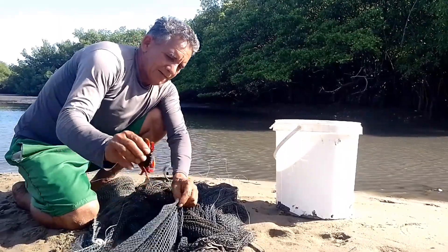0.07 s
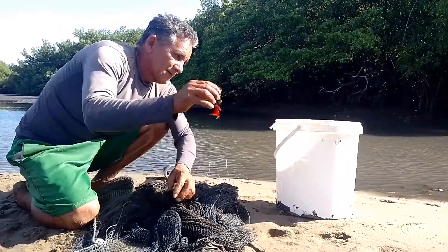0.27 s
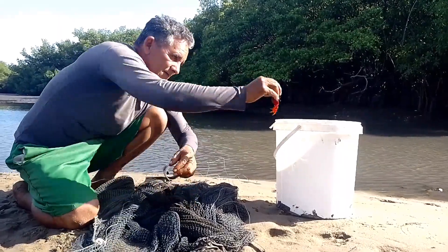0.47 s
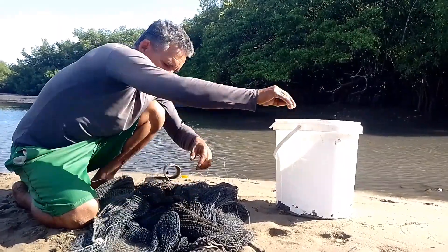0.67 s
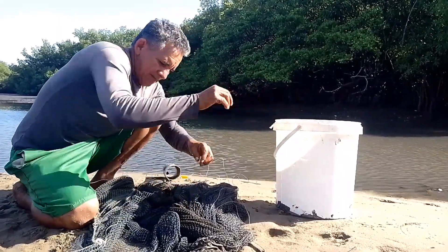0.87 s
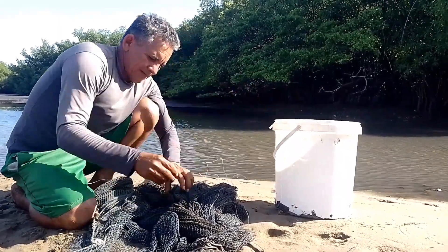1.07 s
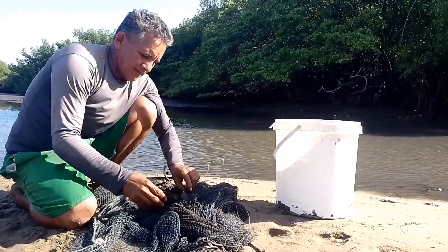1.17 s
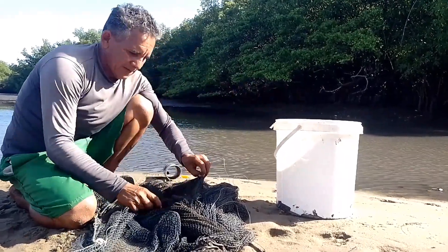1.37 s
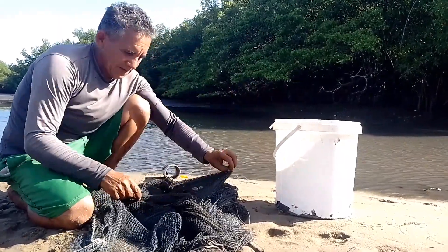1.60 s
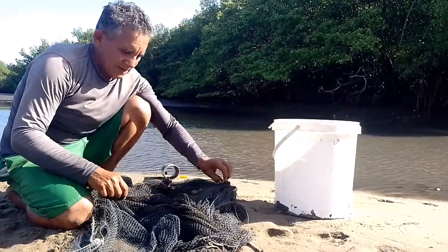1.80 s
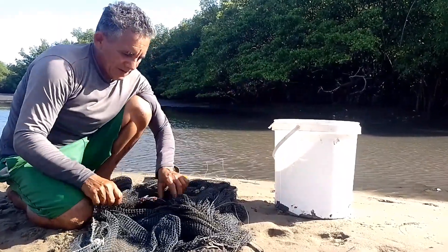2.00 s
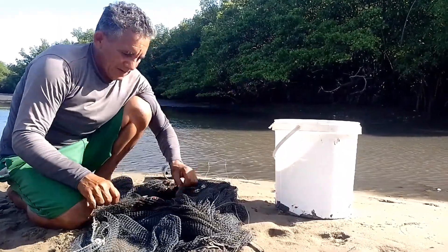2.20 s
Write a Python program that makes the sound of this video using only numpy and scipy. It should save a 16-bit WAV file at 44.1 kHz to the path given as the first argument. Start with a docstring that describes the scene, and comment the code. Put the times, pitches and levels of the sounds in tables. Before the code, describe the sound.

A crab thuds into a plastic bucket and scrabbles inside, with light wind.

```python
"""A crab drops into a plastic bucket on a riverbank. Its shell knocks on the wall and makes it ring,
its wet body thuds and slaps on the base, and its legs scrabble over the plastic in tiny jerks.
A fishing net rustles and ticks as it is handled, and its weights chink together.
Light wind buffets the microphone, most just before the drop, over the quiet hiss of open air."""
import sys
import numpy as np
from scipy import signal
from scipy.io import wavfile
from scipy.ndimage import uniform_filter1d

SR = 44100
rng = np.random.default_rng(int(sys.argv[2]) if len(sys.argv) > 2 else 0)


def int16_out(signal):
    """Quantize to a 16-bit WAV file."""
    q = np.round(np.clip(np.atleast_2d(signal).T, -1, 1) * 32767)
    wavfile.write(sys.argv[1], SR, q.astype(np.int16))


N = 99225

# Levels are relative. A "colour" says how strong a sound is at each frequency.
# colour of the open air: f/Hz, level/dB
AIR_COLOUR = [(290, -35), (500, 2.5), (830, -7), (1260, -14), (2720, -24.5), (9440, -18), (14800, -23.5),
              (15900, -34)]
# wind on the microphone: t/s, flutter level/dB, rumble level/dB
WIND_LEVELS = [(0, -66.5, -66), (.06, -55, -57), (.14, -58, -62), (.23, -46.5, -52), (.3, -56, -54),
               (.34, -42, -53), (.41, -38.5, -50), (.455, -52, -57), (.52, -31, -46), (.56, -44, -54),
               (.64, -49.5, -52), (.7, -52.5, -59), (.8, -60.5, -69.5), (1.14, -65.5, -69.5),
               (1.27, -53, -56.5), (1.35, -57.5, -58), (1.44, -66, -69.5), (1.52, -60, -61),
               (1.72, -64, -60), (1.8, -58.5, -56.5), (1.89, -66.5, -67.5), (2.1, -68.5, -69.5),
               (2.25, -78.5, -71.5)]
# colour of the wind's flutter: f/Hz, level/dB
FLUTTER_COLOUR = [(130, -57), (170, -7.5), (215, 3), (260, 3), (340, 0.5), (420, -17.5), (570, -25.5),
                  (810, -42.5), (1300, -68), (2500, -81)]
# colour of the wind's rumble: f/Hz, level/dB
RUMBLE_COLOUR = [(20, -17.5), (35, -13.5), (56, -1.5), (85, 9), (135, 6), (165, -10.5), (230, -52)]
# the brighter top of the gust: t/s, level/dB
GUST_LEVELS = [(.3, -100), (.36, -66), (.41, -50.5), (.46, -59), (.525, -51), (.57, -58), (.66, -57),
               (.72, -65), (.8, -77)]
# its colour: f/Hz, level/dB
GUST_COLOUR = [(250, -22.5), (430, 4.5), (560, -8), (730, -12.5), (900, -28), (1300, -47.5), (2500, -94)]
# single swirls of air hit the microphone: t/s, level/dB, f/Hz
BUFFETS = [(0.4186, -28.5, 265), (0.487, -29, 320), (0.5139, -28, 267), (0.5258, -25, 380),
           (0.5972, -25, 345), (.632, -38, 380), (1.789, -44.5, 232)]

# the net slides through the hands: t/s, level/dB
NET_LEVELS = [(0, -88.5), (.5, -86), (.7, -82.5), (1.15, -82.5), (1.26, -77.5), (1.43, -85), (1.48, -76),
              (1.75, -81), (1.95, -87), (2.25, -89.5)]
# dry snaps of mesh and claws: t/s, level/dB
SNAPS = [(0.813, -67.5), (0.857, -64), (.873, -64), (.9663, -60), (1.4758, -57), (1.607, -65), (1.812, -73)]
# colour of the rustle and snaps: f/Hz, level/dB
MESH_COLOUR = [(1500, -21), (4800, -7.5), (7000, 0.5), (9500, 2), (12000, -10.5), (16000, -17)]
# the net's weights touch: t/s, level/dB
CHINKS = [(0.486, -54.5), (0.4893, -54), (0.5937, -68)]
# their colour: f/Hz, level/dB
CHINK_COLOUR = [(1500, -34), (4800, -21.5), (7000, -5), (8500, -2.5), (10000, 1.5), (11100, -6),
                (11900, -19), (16000, -31)]

# colour of a blow on the bucket wall: f/Hz, level/dB
WALL_COLOUR = [(300, -44.5), (750, -9), (1130, -0.5), (1400, -12), (1720, -9), (2100, -15), (2850, -16),
               (3600, -25.5), (6000, -31), (15000, -62)]
# colour of the hollow inside: f/Hz, level/dB
HOLLOW_COLOUR = [(120, -22.5), (230, -3.5), (340, 2.5), (500, 1), (700, -12.5), (1500, -54.5)]
# colour of hard shell: f/Hz, level/dB
SHELL_COLOUR = [(800, -32.5), (2100, 10), (2900, 10), (3500, 6), (4000, 6.5), (4800, 0), (5400, 3.5),
                (6400, -5), (9000, -4), (12000, -15.5), (16000, -23.5)]
# notes the wall rings at: f/Hz, level/dB, time to fade by 60 dB/s
WALL_NOTES = [(1055, -5, 0.055), (1348, 1.5, 0.12), (1421, -2, 0.12), (1490, -2.5, 0.22),
              (1550, 0.5, 0.088), (1690, 0, 0.055), (1755, 4.5, 0.024), (2760, -10.5, 0.073),
              (3220, -21.5, 0.17)]
# notes the base booms at: f/Hz, level/dB, time to fade by 60 dB/s
BASE_NOTES = [(256.8, -3, 0.091), (339, -11, 0.058), (500, -10.5, 0.043)]

# legs scrape the plastic: t/s, level/dB
SCRAPE_LEVELS = [(.69, -74.5), (.755, -57), (.775, -41), (.808, -57.5), (.82, -27.5), (.85, -36.5),
                 (.88, -36.5), (.94, -50), (.99, -43), (1.03, -75), (1.15, -53.5), (1.22, -65), (1.32, -66),
                 (1.37, -48.5), (1.44, -67), (1.5, -55), (1.56, -63), (1.76, -72.5)]
# the tumbling shell rasps on the plastic: t/s, level/dB
RASP_LEVELS = [(.69, -85.5), (.712, -73), (.745, -79), (.765, -61), (.808, -77), (.83, -57), (.865, -58.5),
               (.93, -64), (.98, -73), (1.03, -76), (1.1, -74), (1.16, -78.5), (1.55, -77), (1.75, -85.5)]
# a claw drags along the wall: t/s, level/dB
DRAG_LEVELS = [(1.49, -102), (1.52, -65), (1.558, -55), (1.583, -63), (1.6, -73), (1.612, -68), (1.64, -65),
               (1.66, -83), (1.74, -92)]
# its colour: f/Hz, level/dB
DRAG_COLOUR = [(350, -30.5), (510, 2), (650, -28.5), (1300, -29.5), (1500, 0), (1620, -11), (1765, 8),
               (1900, -13.5), (2250, -12.5), (3300, -32.5)]
# single scratches of leg tips: t/s, length/s, level/dB, f/Hz
SCRATCHES = [(.76, .016, -62.5, 4000), (.826, .014, -46, 2990), (0.835, .006, -60, 5600),
             (0.843, .024, -46.5, 2880), (0.846, .004, -69, 5200), (0.873, .005, -55, 3800),
             (0.886, .012, -49, 2780), (0.904, .006, -52.5, 3080), (0.9202, .004, -54.5, 3060),
             (.926, .007, -56.5, 5370), (.941, .006, -58, 3700), (0.969, .032, -58.5, 3200),
             (1.017, .005, -62, 2830), (1.065, .004, -59, 2850), (1.1085, .004, -64, 3090),
             (1.236, .006, -58.5, 1510), (1.378, .006, -58, 492), (1.444, .006, -66, 1490),
             (1.606, .003, -59, 2750)]
# colour of the wet slap: f/Hz, level/dB
SLAP_COLOUR = [(2500, -30), (6000, -1), (9300, -4), (11500, -9.5), (15000, -19)]
# shell and claws hit the wall: t/s, wall level/dB, hollow level/dB, tick level/dB, clack f/Hz
KNOCKS = [(0.7689, -44.5, -44.5, -54, 1470), (0.7838, -42.5, -55, -56, 1560),
          (0.814, -34.5, -37.5, -48, 1660), (0.8282, -43, -35.5, -41, 1550),
          (0.8355, -34.5, -65, -47, 1030), (0.8484, -27.5, -64, -39.5, 1022),
          (0.856, -37, -43.5, -64, 1300), (0.8739, -50, -46, -50, 1340), (0.8894, -48, -44, -54, 1850),
          (0.9058, -38.5, -36, -46.5, 1530), (0.921, -53, -44, -53, 1360), (0.9304, -40, -43.5, -65, 1430),
          (0.9406, -43, -42.5, -47.5, 1150), (0.9667, -45, -39.5, -44, 1300), (0.9905, -45, -60, -70, 1490),
          (1.0172, -35.5, -41, -73, 1300), (1.0663, -35, -49.5, -52, 1442),
          (1.1085, -45.5, -51.5, -63, 1536), (1.1862, -38.5, -44, -52.5, 1440),
          (1.1994, -49, -52.5, -77, 1440), (1.2282, -56, -57, -60, 1490), (1.274, -45, -44.5, -61, 1350),
          (1.3548, -45, -61, -59, 1480), (1.51, -49, -50, -51.5, 1590), (1.5533, -45.5, -53, -51.5, 1690),
          (1.609, -47, -73, -71, 1760), (1.6323, -51, -75, -57, 1780), (1.6798, -58, -66, -58, 1810),
          (1.6952, -55.5, -73, -60.5, 1490)]
# the body lands and settles on the base: t/s, level/dB
THUDS = [(0.8215, -21.5), (0.8377, -20.5), (0.8499, -18), (1.016, -40.5)]


def amp(db):
    """Turns decibels into a number to multiply by."""
    return 10 ** (np.asarray(db) / 20)


def unit(x):
    """Scales a sound to an average power of 1."""
    return x / np.sqrt(np.mean(x ** 2) + 1e-20)


def burst(x):
    """Gives a short sound the energy of 4 ms at power 1."""
    return x / np.sqrt(np.sum(x ** 2) / (.004 * SR) + 1e-20)


def curve(table, column=1):
    """Joins a table's levels into a volume that changes over time."""
    rows = np.array(table)
    return amp(np.interp(np.arange(N) / SR, rows[:, 0], rows[:, column]))


def add(mix, s, sound):
    """Mixes a sound in at s seconds."""
    part = mix[round(s * SR):][:len(sound)]
    part += sound[:len(part)]


def response(colour, size=4096):
    """A click with the given colour, to use as a filter."""
    hz, db = np.transpose(colour)
    bin_hz = abs(np.fft.fftfreq(size, 1 / SR))
    log_gain = np.log(amp(np.interp(np.log(bin_hz + 1), np.log(hz), db)))
    spectrum = np.exp(np.conj(signal.hilbert(log_gain)))  # packs the energy at the start
    return np.fft.ifft(spectrum).real[:size // 2]


def through(x, ring):
    """Filters x: each of its samples sets off a copy of ring."""
    return signal.fftconvolve(x, ring)[:len(x)]


def noise(colour):
    """Steady noise with the given colour."""
    return unit(through(rng.standard_normal(N + 2048), response(colour))[-N:])


def steadied(x, span_s):
    """Evens out the chance swells of a noise."""
    power = abs(uniform_filter1d(x ** 2, round(span_s * SR)))
    return x / np.sqrt(power + 0.15)


def grains(per_s, spread_db):
    """Tiny slips at random times, a few of them large."""
    sizes = rng.standard_normal(N) * amp(spread_db * np.minimum(rng.exponential(1, N), 4))
    return sizes * (rng.random(N) < per_s / SR)


def short_note(hz, rise_s, size=4096):
    """A note that builds over rise_s and quickly dies."""
    t = np.arange(size) / SR
    shape = (t / rise_s * np.exp(-t / rise_s)) ** 1.93
    return burst(shape * np.sin(2 * np.pi * hz * t))


def strike(ring, echo_s, echo_db, contact_s=0.00077, chatter_db=-4.5, size=4096):
    """One hit: a click, the chatter of touching surfaces and a short spray of echoes."""
    t = np.arange(size) / SR
    click = (t == 0) * 1.
    chatter = rng.standard_normal(size) * np.exp(-t / contact_s)
    echoes = rng.standard_normal(size) * np.exp(-t / echo_s) * (1 - np.exp(-t / contact_s))
    parts = [(click, 0), (chatter, chatter_db), (echoes, echo_db)]
    return burst(sum(amp(db) * burst(through(part, ring)) for part, db in parts))


def open_air():
    """A faint, steady hiss."""
    return amp(-78) * noise(AIR_COLOUR)


def wind(buffet_cycles=0.81):
    """Moving air flutters and rumbles on the microphone; single swirls bump it."""
    out = curve(WIND_LEVELS, column=1) * steadied(noise(FLUTTER_COLOUR), span_s=0.093)
    out += curve(WIND_LEVELS, column=2) * steadied(noise(RUMBLE_COLOUR), span_s=0.078)
    out += curve(GUST_LEVELS) * steadied(noise(GUST_COLOUR), span_s=0.073)
    t = np.arange(-SR // 50, SR // 50) / SR
    for s, db, hz in BUFFETS:
        bump = np.cos(2 * np.pi * hz * t) / np.cosh(2 * hz * t / buffet_cycles)
        add(out, s + t[0], amp(db) * bump)
    return out


def net(clump_s=.015, clump_db=3.2):
    """Sliding mesh rustles in small clumps, with dry snaps and chinking weights."""
    mesh, metal = response(MESH_COLOUR), response(CHINK_COLOUR)
    rustle = through(grains(per_s=4300, spread_db=3.5), mesh)
    clumps = unit(uniform_filter1d(rng.standard_normal(N), round(clump_s * SR)))
    out = curve(NET_LEVELS) * unit(rustle * amp(clump_db * clumps))
    for s, db in SNAPS:
        add(out, s, amp(db) * strike(mesh, echo_s=0.0055, echo_db=-5.5, contact_s=0.00038))
    for s, db in CHINKS:
        add(out, s, amp(db) * strike(metal, echo_s=0.0095, echo_db=7, contact_s=0.0012, chatter_db=19))
    return out


def wall_ring(size=6000):
    """The wall rings with a different mix of its notes wherever it is touched."""
    out, t = np.zeros(size), np.arange(size) / SR
    for hz, db, fade_s in WALL_NOTES:
        share, detune = rng.standard_normal(2)
        tone = np.sin(2 * np.pi * hz * (1 + 0.012 * detune) * t)
        out += share * amp(db - 60 * t / fade_s) * tone
    return burst(out)


def leg_scrape(slips_per_s=1500, spread_db=-4.5):
    """Legs slip along the wall in many small jerks that keep it ringing."""
    scrape = unit(through(grains(slips_per_s, spread_db), response(WALL_COLOUR)))
    ring = unit(sum(through(grains(slips_per_s / 4, spread_db), wall_ring()) for _ in range(4)))
    return amp(-19.5) * curve(SCRAPE_LEVELS) * (scrape + ring)


def shell_rasp(slip_fade_s=0.0025):
    """Shell rubs on plastic; each slip is a tiny puff of noise."""
    slips = grains(per_s=1500, spread_db=2)
    fade = np.exp(-np.arange(SR // 20) / SR / slip_fade_s)
    grip = np.sqrt(abs(through(slips ** 2, fade)))
    return curve(RASP_LEVELS) * unit(through(grip * rng.standard_normal(N), response(SHELL_COLOUR)))


def claw_drag():
    """One claw judders along the wall."""
    slips = grains(per_s=1500, spread_db=4)
    return curve(DRAG_LEVELS) * unit(through(slips, response(DRAG_COLOUR)))


def scratch(length_s, hz, gap_s=.003, spread_db=5.5, fade_cycles=6.6, size=4096):
    """A leg tip sticks and slips; each jerk crackles and briefly rings the plastic."""
    t, jerks = np.arange(size) / SR, np.zeros(size)
    gaps = gap_s * rng.uniform(0.54, 1.5, size=24)
    strengths = amp(spread_db * rng.standard_normal(24))
    for s, strength in zip(np.cumsum(gaps) - gaps[0], strengths):
        if s < length_s:
            add(jerks, s, np.array([strength]))
    ring = np.exp(-t * hz / fade_cycles) * np.sin(2 * np.pi * hz * t)
    grit = burst(through(jerks, response(SHELL_COLOUR)))
    return burst(through(jerks, ring)) + amp(-11) * grit


def leg_scratches():
    """Leg tips scratch the plastic, each at its own pitch."""
    out = np.zeros(N)
    for s, length_s, db, hz in SCRATCHES:
        add(out, s, amp(db) * scratch(length_s, hz))
    return out


def wet_slap(at_s=.823, fade_s=0.018):
    """The wet body slaps down with a bright crackle that dies away."""
    out, t = np.zeros(N), np.arange(SR // 4) / SR
    crackle = rng.standard_normal(len(t)) ** 3 * np.exp(-t / fade_s)  # cubing makes noise spiky
    add(out, at_s, amp(-53.5) * burst(through(crackle, response(SLAP_COLOUR))))
    return out


def shell_knocks():
    """Each blow makes the wall clack and ring, the inside sound hollow and the shell tick."""
    out = np.zeros(N)
    wall, hollow, shell = response(WALL_COLOUR), response(HOLLOW_COLOUR), response(SHELL_COLOUR)
    for s, wall_db, hollow_db, tick_db, hz in KNOCKS:
        add(out, s, amp(wall_db - 9.5) * short_note(hz, rise_s=0.0018))
        add(out, s, amp(wall_db - 19) * strike(wall, echo_s=0.0057, echo_db=3.5))
        add(out, s, amp(wall_db - 12) * wall_ring())
        add(out, s, amp(hollow_db - 8) * short_note(hz=345, rise_s=0.0037))
        add(out, s, amp(hollow_db - 5) * strike(hollow, echo_s=0.012, echo_db=5.5))
        add(out, s, amp(tick_db - 10) * strike(shell, echo_s=0.0056, echo_db=7, chatter_db=6.5))
    return out


def crab_landing(boom_rise_s=0.009, low_cut_hz=155):
    """Soft, heavy blows push the base in and leave it booming; being small, it gives little bass."""
    out, t = np.zeros(N), np.arange(SR // 4) / SR
    push = amp(-7) * short_note(hz=300.6, rise_s=.0048)
    boom = sum(amp(db - 60 * t / fade_s) * np.sin(2 * np.pi * hz * t) for hz, db, fade_s in BASE_NOTES)
    boom *= 1 - np.exp(-(t / boom_rise_s) ** 2)
    for s, db in THUDS:
        add(out, s, amp(db) * push)
        add(out, s, amp(db) * boom)
    return signal.sosfilt(signal.butter(2, low_cut_hz, "highpass", fs=SR, output="sos"), out)


def scene():
    """The crab, the net, the wind and the air, mixed into one channel."""
    crab = crab_landing() + shell_knocks() + leg_scratches() + wet_slap()
    crab += leg_scrape() + shell_rasp() + claw_drag()
    return (crab + net() + wind() + open_air())[None]


def record(dry, low_cut_hz=23, dip_hz=166, high_cut_hz=15600):
    """The microphone loses the deepest bass, a narrow band above it and the highest treble."""
    thinned = signal.sosfilt(signal.butter(2, low_cut_hz, "highpass", fs=SR, output="sos"), dry)
    dipped = signal.lfilter(*signal.iirnotch(dip_hz, Q=6, fs=SR), thinned)
    treble_cut = signal.firwin(511, high_cut_hz, window=("kaiser", 9), fs=SR)
    return signal.oaconvolve(dipped, treble_cut[None], "same")


dry = scene()
out = record(dry)
int16_out(out)
```